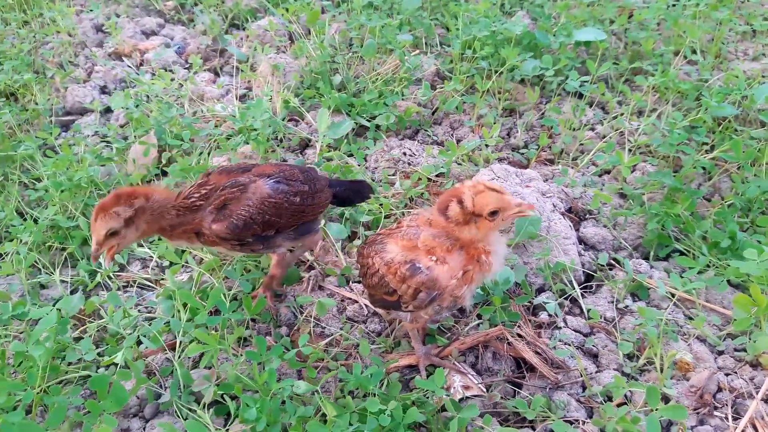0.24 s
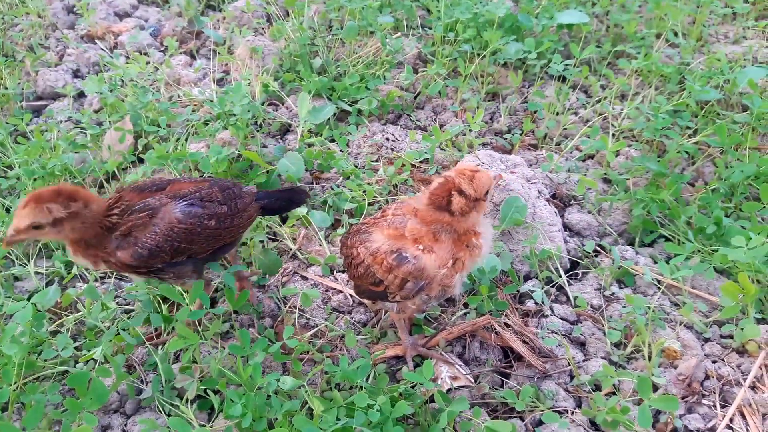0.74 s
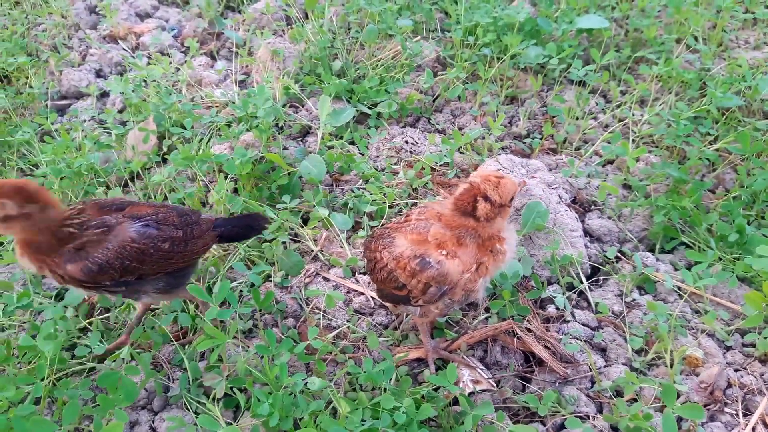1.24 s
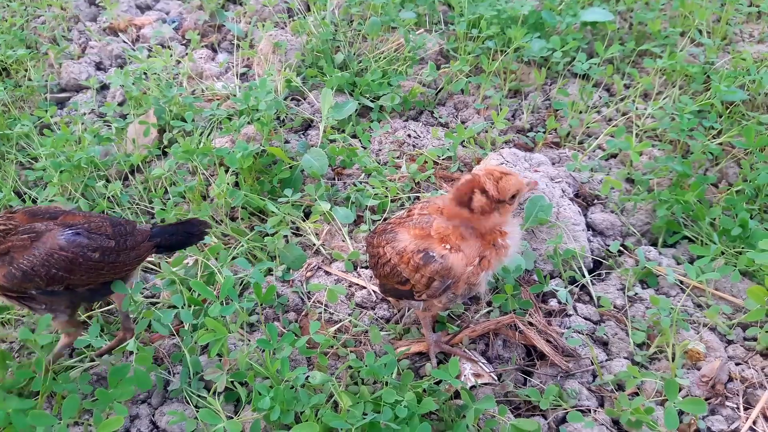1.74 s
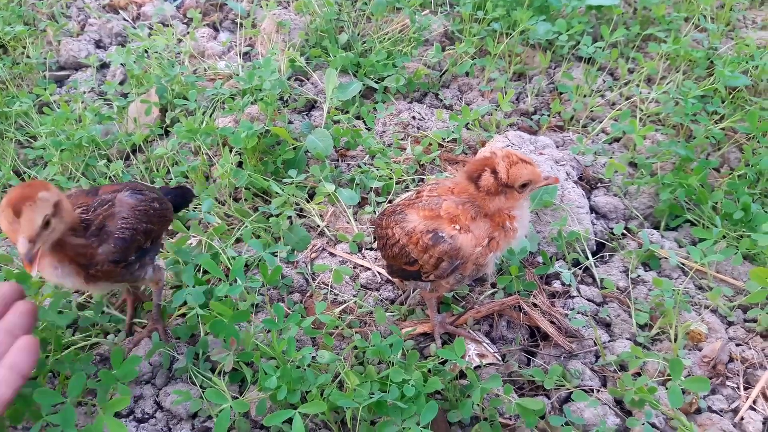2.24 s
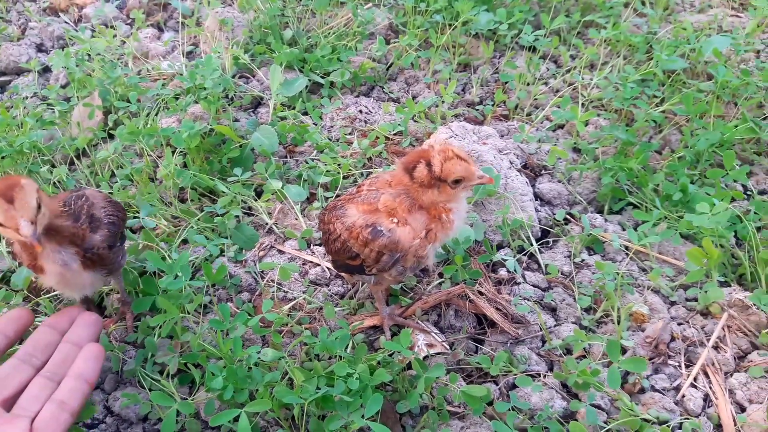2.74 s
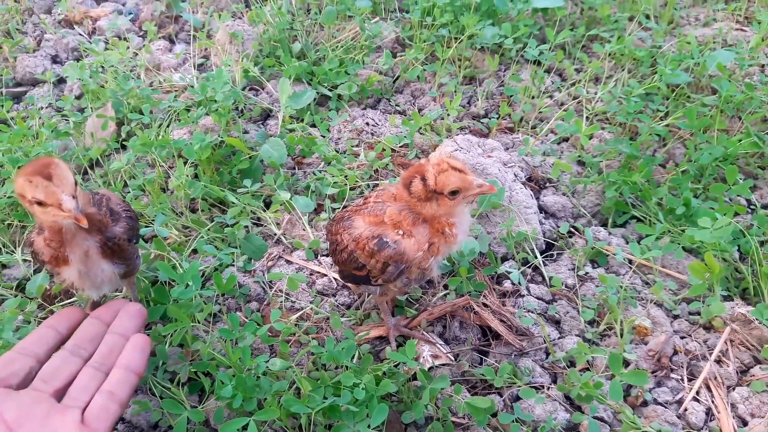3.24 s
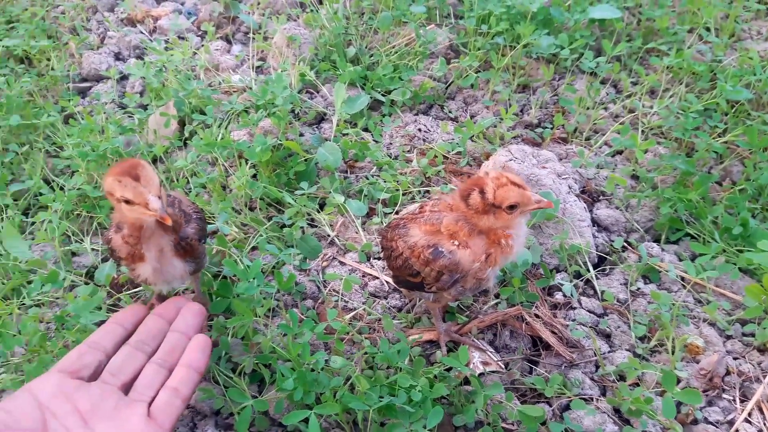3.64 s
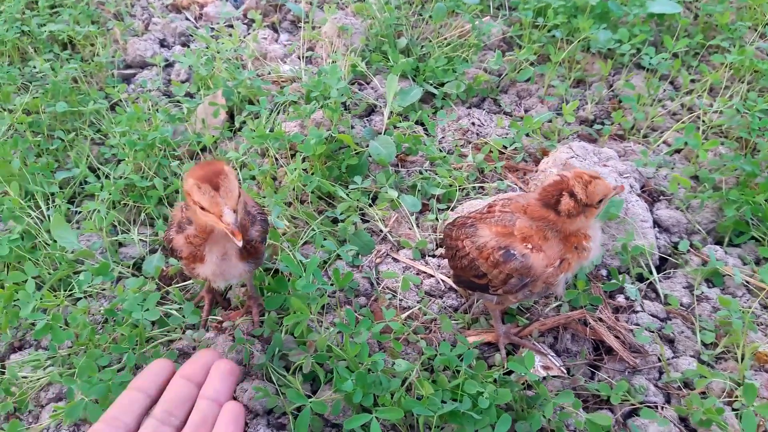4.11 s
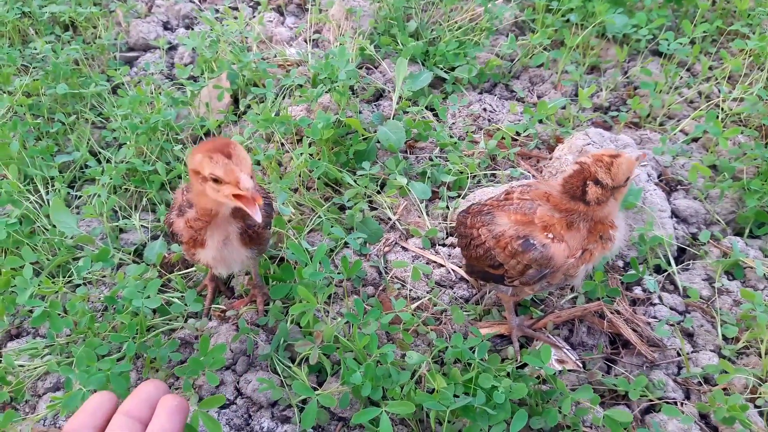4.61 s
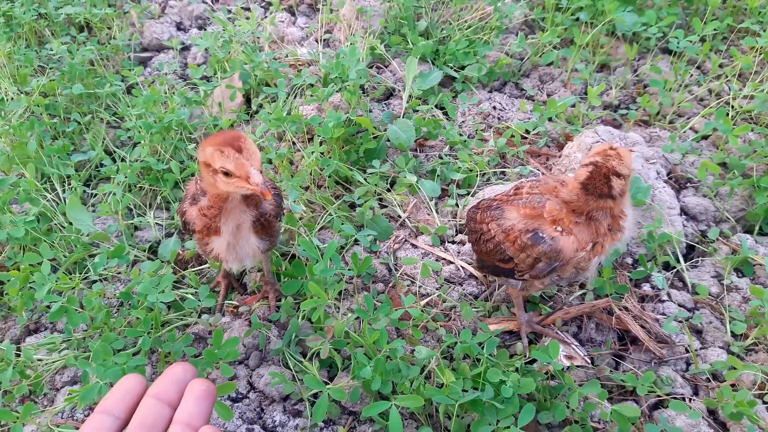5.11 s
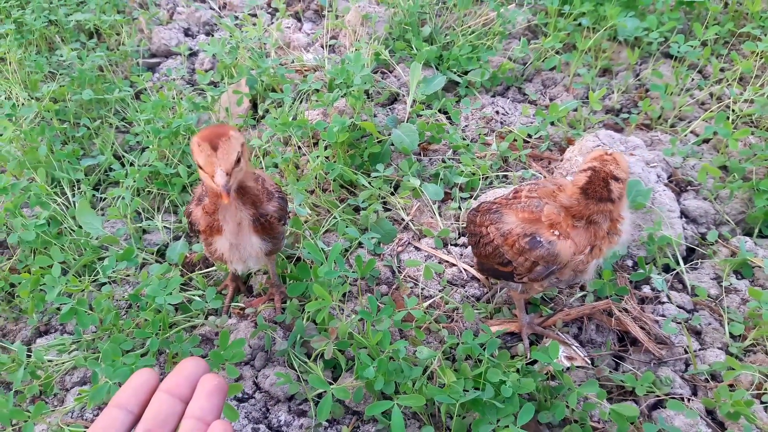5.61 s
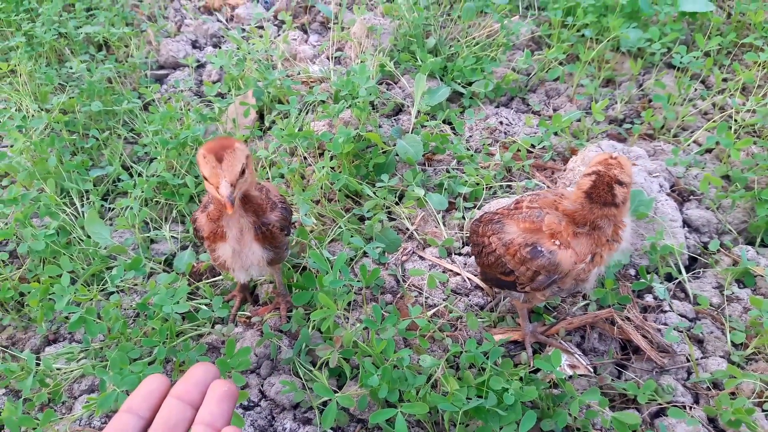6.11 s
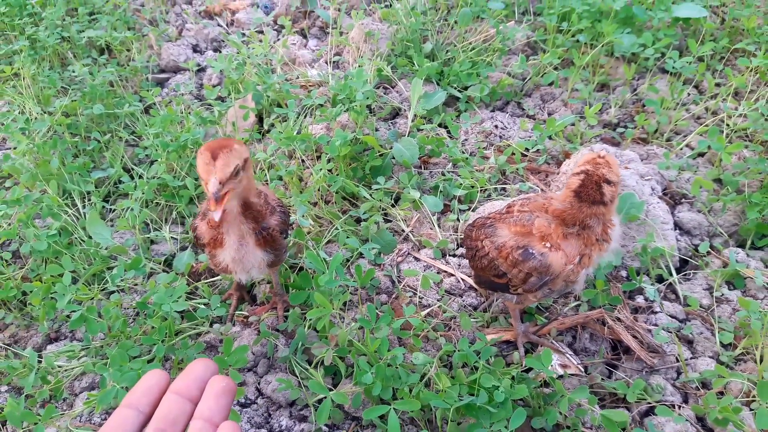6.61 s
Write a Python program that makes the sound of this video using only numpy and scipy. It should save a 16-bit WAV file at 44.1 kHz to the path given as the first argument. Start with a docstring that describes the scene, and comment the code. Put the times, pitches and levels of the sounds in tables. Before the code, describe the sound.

Close outdoor pickup of a loud chick giving short, shrill, down-stepping peeps with slightly raspy, buzzing edges, while a thinner-voiced chick cheeps now and then beside it. Calls are sparse at first, then regular, with a last pair after a short gap. A dull handling knock sounds halfway, with a faint coo far off just before. A weak distant rumble and hiss fill the gaps; the space is dry and open.

```python
"""A loud chick peeps on weedy ground in front of a phone, each peep stepping down into a hold and a falling tail.
A second, thinner chick calls beside it; both are near sines with overtones, heard by two microphone ports.
Short noisy rasps edge the loud voice, and the ground scatters a little of the birds' sound back.
Two low knocks reach the phone as damped rings, and one faint low gliding tone coos far off.
A far drone with a band of hiss, built from random short-time spectra, fills the gaps."""
import sys
import numpy as np
from scipy import signal
from scipy.fft import rfft, irfft, next_fast_len
from scipy.io import wavfile
from scipy.ndimage import uniform_filter1d

SR = 44100
rng = np.random.default_rng(int(sys.argv[2]) if len(sys.argv) > 2 else 0)


def int16_out(signal):
    """Quantize to a 16-bit WAV file."""
    q = np.round(np.clip(np.atleast_2d(signal).T, -1, 1) * 32767)
    wavfile.write(sys.argv[1], SR, q.astype(np.int16))


N = 302526  # samples
EDGE_HZ = 16400  # top of the band
PORT_PAD = 1024  # samples of silence ahead of a sound sent through the ports


def loud_chick():
    """The loud bird: stepped peeps with period doubling, then two sides of the syrinx beating."""
    # one row a peep: start, step lands, period doubling starts, sides of the syrinx part, end [t/s];
    # first, before step, after step, mid hold, end of hold [f/Hz];
    # lead-in, before step, step, mid hold, end of hold, tail [level/dB]; half pitch, quarter pitch [level/dB];
    # opening gap of the sides [f/Hz], overtone brightness [level/dB], extra lead of the left port [us]
    loud_peeps = [ (0.23, 0.264, 0.33, 0.359, 0.377, 3660, 3390, 3280, 3040, 2790, -7, -9, -10, -12.5, -17.5, -19, -19.5, -45, 15, -1, 60),
                  (1.857, 1.892, 1.962, 1.997, 2.022, 4150, 3260, 3070, 2850, 2710, -48, -12, -8.5, -19.5, -13, -10, -13, -19, 18, -4, 100),
                  (2.317, 2.433, 2.448, 2.488, 2.497, 4440, 3270, 2924, 2720, 2540, -27, -3, -4.5, -6.5, -12, -24, -11.5, -24.5, 4, -3.5, 60),
                  (2.887, 2.97, 2.999, 3.072, 3.13, 4280, 3330, 2967, 2750, 2720, -21, -9, -4, -7, -8, -6, -14, -33, 107.5, -1, 55),
                  (3.368, 3.467, 3.478, 3.531, 3.575, 3865, 3460, 2940, 2790, 2750, -19, -6, -4.5, -7.5, -9, -11, -10.5, -21, 121, -1.5, 40),
                  (3.98, 4.062, 4.107, 4.172, 4.213, 3880, 3620, 2965, 2780, 2710, -22, -12.5, -4, -7, -9.5, -5, -14.5, -44, 141, 1, 0),
                  (4.567, 4.66, 4.683, 4.758, 4.82, 4450, 3560, 2990, 2780, 2735, -24, -17, -6.5, -10, -7, -4.5, -13, -30, 110, 0.5, 0),
                  (5.243, 5.308, 5.357, 5.406, 5.475, 3900, 3440, 2940, 2830, 2730, -19, -21, -5.5, -8.5, -6, -4.5, -12.5, -39, 102.5, 0.5, 0),
                  (5.724, 5.82, 5.837, 5.896, 5.945, 3900, 3330, 2900, 2805, 2700, -28, -10, -6.5, -9, -7.5, -5.5, -13, -42, 84, 1.5, 0),
                  (6.52, 6.585, 6.613, 6.676, 6.728, 3690, 3400, 2890, 2715, 2640, -22.5, -11, -6.5, -9.5, -10, -9, -14.5, -56, 121, -0.5, 0),
                  ]
    # unsteady moments: start [t/s], length [s], phase wander scale [rad], flutter [f/Hz], flutter depth [0-1]
    loud_breaks = [(2.325, .04, .4, 90, .5), (2.385, .012, .3, 45, .9), (2.417, .012, .12, 60, .5),
                   (4.575, .03, .45, 150, .5), (6.56, .016, .1, 110, .15)]
    out = np.zeros((2, N))
    for start, step, double, part, *shape, half_db, quarter_db, gap_hz, bright_db, lead_us in loud_peeps:
        rows = loud_shape(start, step, part, *shape)
        voice = peep(rows, bright_db, .1, loud_breaks, double, part, half_db, quarter_db, gap_hz)
        add(out, start - PORT_PAD / SR, ports(voice, lead_us, .1))
    return out


def loud_shape(start, step, part, end, first_hz, edge_hz, low_hz, mid_hz, hold_hz,
               lead_db, edge_db, step_db, mid_db, hold_db, tail_db):
    """Soft sagging lead-in, a step down into a loud hold, a turn and a falling tail: (s, Hz, dB) rows."""
    step_s, turn_s = .013, .012  # length of the step, of the turn into the tail
    turn_hz, end_hz, lead_curl = 120, 2160, 1.5  # drop in the turn, last pitch, bend of the lead-in
    onset_db, step_dip_db, tail_sag_db, tail_end_db = -11, -3.5, -3.5, -22
    edge, turn = step - step_s, part - turn_s
    part_hz = hold_hz - turn_hz
    u = np.linspace(0, 1, 5)  # stations of the lead-in
    lead_in_s = start + u * (edge - start)
    lead_in_hz = first_hz + (edge_hz - first_hz) * u ** lead_curl
    lead_in_db = np.interp(u, [0, .25, 1], [lead_db + onset_db, lead_db, edge_db])
    return [*zip(lead_in_s, lead_in_hz, lead_in_db),
            (step - step_s / 3, low_hz + (edge_hz - low_hz) / 4, step_db),
            (step, low_hz, step_db + step_dip_db),
            (step + .6 * (turn - step), mid_hz, mid_db),
            (turn, hold_hz, hold_db),
            (part, part_hz, tail_db),
            (part + .55 * (end - part), part_hz + .6 * (end_hz - part_hz), tail_db + tail_sag_db),
            (end, end_hz, tail_db + tail_end_db)]


def peep(rows, bright_db, tilt_db, breaks, start=0, part_s=0, half_db=-99, quarter_db=-99, part_hz=0):
    """A near sine with overtones; period doubling adds half orders, the parting sides of the syrinx beat."""
    s, hz, db = np.transpose(rows)
    t = np.arange(s[0], s[-1], 1 / SR)
    hz = uniform_filter1d(np.interp(t, s, hz), size=130)
    db = uniform_filter1d(np.interp(t, s, db), size=130)
    jitter = 1 + .005 * fuzz(len(t), 170).real
    turn = 2 * np.pi * np.cumsum(hz * jitter) / SR  # phase of the fundamental, rad

    for at, length, wander, flutter_hz, depth in breaks:
        on = np.clip(np.minimum(t - at, at + length - t) / 0.0034, 0, 1)
        turn = turn + wander * on * fuzz(len(t), 450).real
        flutter = np.sin(2 * np.pi * flutter_hz * (t - at))
        db = db + 20 * np.log10(1 - np.clip(depth, 0, .95) * on * flutter)

    since = np.maximum(t - part_s, 0) * (part_hz > 0)  # seconds since the sides parted
    apart = np.pi * part_hz * since * (1 + 3 * since)  # the gap widens as the breath runs out
    beat = np.cos(apart)
    voice = beat * np.sin(turn)

    smear = 1 + gain_of(-20.5) * fuzz(len(t), 1500)  # turbulence fills the space between overtones
    for k in range(2, 7):
        level_db = bright_db + 5.1 * fuzz(len(t), 41).real - tilt_db * max(k - 3, 0)
        level_db -= 300 * since * (k - 2)  # the high overtones die first once the sides part
        level_db -= 0.14 * (db + 9.5)  # swells lift the fundamental more than the overtones
        partial = (smear * np.exp(1j * k * turn)).real
        voice += gain_of(level_db) * overtone(k * hz) * beat ** k * partial

    # period doubling fades in, and out again as the sides part
    gate = np.clip(np.minimum(t - start, part_s - .008 - t) / 0.018 + .5, 0, 1) ** 2
    gate = gate * gain_of(0.78 * fuzz(len(t), 63).real)  # the doubling is unsteady
    halves = np.sin(turn / 2) + gain_of(-6.5) * np.sin(3 * turn / 2)
    for k in range(5, 13, 2):
        halves += gain_of(bright_db) * overtone(k * hz / 2) ** 0.57 * np.sin(k * turn / 2)
    quarters = np.sin(5 * turn / 4)
    voice += gate * (gain_of(half_db) * halves + gain_of(quarter_db) * quarters)

    # air rushing past the folds: fuzz around the pitch and a thin wide hiss
    voice += gain_of(-33) * (fuzz(len(t), 1100) * np.exp(1j * turn)).real
    voice += gain_of(-48.5) * np.diff(rng.standard_normal(len(t) + 1))
    return np.sqrt(2) * gain_of(db) * voice * signal.windows.tukey(len(t), .04)


def overtone(hz):
    """Gain of an overtone: a low base plus the windpipe resonances."""
    # resonances of the windpipe that lift the overtones: centre [f/Hz], width [Hz], peak [level/dB]
    windpipe = [(5600, 800, -20.5), (8670, 520, -27.5), (11525, 520, -26.5), (14700, 740, -22.5)]
    peaks = sum(gain_of(db) / (1 + (2 * (hz - f) / w) ** 2) for f, w, db in windpipe)
    return (gain_of(-42.5) + peaks) * (hz < EDGE_HZ)


def thin_chick():
    """The thinner bird: single-voiced peeps whose steep tilt keeps the high overtones weak."""
    # one row a peep: start, drop starts, drop lands, final fall starts, end [t/s];
    # top, after the drop, before the fall, end [f/Hz];
    # top, after the drop, before the fall, swell in the fall [level/dB]; extra lead of the left port [us]
    thin_peeps = [ (0.163, 0.173, 0.179, 0.3, 0.33, 4620, 4170, 3640, 3100, -42, -24, -13, -9, 65),
                  (0.53, 0.6, 0.622, 0.638, 0.696, 4590, 4360, 4000, 2540, -28.5, -21, -21.5, -10, 105),
                  (3.152, 3.164, 3.172, 3.27, 3.307, 4500, 4067, 3780, 2720, -49, -27.5, -15.5, -15.5, 125),
                  (4.012, 4.047, 4.055, 4.135, 4.172, 4590, 3970, 3720, 2860, -34, -23.5, -20.5, -11, 35),
                  (4.608, 4.618, 4.625, 4.703, 4.749, 4160, 4050, 3730, 2930, -24, -21, -10, -14, 40),
                  (4.927, 5.01, 5.03, 5.054, 5.098, 4570, 4300, 3930, 2250, -21.5, -19.5, -20, -10, 45),
                  (5.753, 5.792, 5.826, 5.888, 5.936, 4520, 3780, 3660, 2680, -20.5, -15, -12, -11, 40),
                  (6.515, 6.568, 6.606, 6.658, 6.694, 4480, 3700, 3510, 2700, -24, -13, -8, -12, 45), ]
    # the voice turns chaotic and flutters: start [t/s], length [s], phase wander scale [rad],
    # flutter [f/Hz], flutter depth [0-1]
    thin_breaks = [(.18, .05, .3, 125, .3), (5.03, .033, .5, 210, .85), (5.796, .014, .8, 200, .3)]
    out = np.zeros((2, N))
    for *shape, lead_us in thin_peeps:
        voice = peep(thin_shape(*shape), -2.6, 9.9, thin_breaks)
        add(out, shape[0] - PORT_PAD / SR, ports(voice, lead_us, 5.4))
    return out


def thin_shape(start, drop, land, fall, end, top_hz, shelf_hz, knee_hz, end_hz,
               top_db, shelf_db, knee_db, swell_db):
    """A quiet arched top, a drop to a slowly sagging shelf, a quick fall that swells and dies: (s, Hz, dB) rows."""
    scoop_hz, fall_curl = 90, 1.9  # rise into the top, bend of the fall
    onset_db, end_db, swell_sag_db = -10, -34, -2
    u = np.array([0, .27, .55, .8, 1])  # stations of the fall
    fall_s = fall + u * (end - fall)
    fall_hz = knee_hz + (end_hz - knee_hz) * u ** fall_curl
    fall_db = [knee_db, swell_db + swell_sag_db, swell_db, swell_db + 2 * swell_sag_db, swell_db + end_db]
    return [(start, top_hz - scoop_hz, top_db + onset_db),
            ((start + drop) / 2, top_hz, top_db),
            (drop, top_hz - scoop_hz / 2, top_db + 1),
            (land, shelf_hz, shelf_db),
            *zip(fall_s, fall_hz, fall_db)]


def rasps():
    """Short bands of noise beside the loud voice: a carrier smeared by low-passed noise."""
    # one row a rasp: start [t/s], length [s], centre [f/Hz], [level/dB]
    bursts = [(2.901, 0.035, 3300, -33.5), (3.38, 0.043, 3000, -31.5), (3.987, 0.051, 3100, -31.5),
              (4.573, 0.032, 4600, -27.5), (4.61, .03, 3200, -36), (2.325, .04, 3500, -36),
              (5.255, .03, 3100, -35), (5.738, 0.05, 2950, -33.5), (6.535, .022, 2850, -33)]
    out = np.zeros((2, N))
    for s, length, hz, db in bursts:
        t = np.arange(0, length, 1 / SR)
        band = (fuzz(len(t), 420) * np.exp(2j * np.pi * hz * t)).real
        burst = gain_of(db) * band * np.hanning(len(t)) ** .5
        add(out, s - PORT_PAD / SR, ports(burst, 40, 1.5))
    return out


def ports(x, lead_us, lean_db):
    """Two microphone ports hear a ground source with their own colour and delay; mean power of the two stays."""
    # left over right before the source's own lean: [f/Hz], [level/dB]
    port_db = [(1400, 2), (2250, -7.5), (2700, -1.6), (3900, 2.5), (4500, 15), (5500, 12), (6200, 6.5),
               (7800, 27.5), (16000, 14)]
    # phase by which the left leads before the source's extra lead: [f/Hz], [rad]
    port_lead = [(0, 0), (1400, 1.7), (2400, 4.5), (2900, 5.6), (3900, 8.5), (5940, 12.4), (16000, 21)]
    size = next_fast_len(len(x) + 4096)
    hz = np.fft.rfftfreq(size, 1 / SR)
    right = gain_of(-read(port_db, hz) - lean_db)
    lead = np.interp(hz, *np.transpose(port_lead)) + 2 * np.pi * hz * lead_us / 10 ** 6
    pair = np.array([np.ones(len(hz)), right * np.exp(-1j * lead)])
    pair = pair * np.sqrt(2 / (1 + right ** 2))
    return irfft(rfft(np.pad(x, PORT_PAD), size) * pair, size)


def ground(x):
    """Sparse dying taps: stones and leaves scatter a little sound back."""
    t = np.arange(200, 12000)  # samples
    signs = rng.choice([-1., 1.], (2, len(t)))
    present = rng.random((2, len(t))) < .1
    taps = signs * present * gain_of(-60 * t / SR / .07)  # dies by 60 dB in 0.07 s
    taps = taps / np.linalg.norm(taps, axis=1, keepdims=True)
    taps = np.pad(taps, ((0, 0), (200, 0)))
    return signal.fftconvolve(x, taps, axes=1)[:, :N]


def knocks():
    """Low knocks reaching the phone: damped rings of two partials."""
    # one row a knock: start [t/s], [level/dB], lower partial [f/Hz], time to die by 60 dB [s]
    hits = [(3.551, -20, 160, 0.038), (6.05, -33.5, 307, 0.059)]
    out, t = np.zeros(N), np.arange(6000) / SR
    for s, db, hz, t60 in hits:
        ring = np.sin(2 * np.pi * hz * t) + .5 * np.sin(2 * np.pi * 1.83 * hz * t)
        attack = np.minimum(t / 0.0056, 1)
        add(out, s, gain_of(db - 60 * t / t60) * ring * attack)
    return out


def coos():
    """A faint far coo: a soft glide of a fundamental and its octave."""
    # one row a coo: start [t/s], length [s], first [f/Hz], last [f/Hz], [level/dB]
    glides = [(3.126, 0.157, 313, 259, -45.5)]
    out = np.zeros(N)
    for s, length, first_hz, last_hz, db in glides:
        turn = 2 * np.pi * np.cumsum(np.linspace(first_hz, last_hz, round(length * SR))) / SR
        tone = np.sin(turn) + gain_of(-13) * np.sin(2 * turn)
        add(out, s, gain_of(db) * tone * signal.windows.tukey(len(turn), .4))
    return out


def drone():
    """The far drone and hiss: random short-time spectra with drifting patches, partly alike at both ports."""
    # relative spectrum: [f/Hz], density [level/dB]
    spectrum = [(21, -47), (35, -27), (76, 2), (170, -4.5), (319, -15.5), (940, -20), (1350, -10.5),
                (1980, -7), (2700, -20), (5000, -26), (8600, -49.5), (12000, -35), (16300, -30.5)]
    # likeness of the two ports: [f/Hz], correlation [-1 to 1]
    likeness = [(60, .93), (300, 0.75), (900, 0.3), (2000, 0.49), (4000, -0.099)]
    # left over right: [f/Hz], [level/dB]
    balance = [(60, 0.5), (800, 3.5), (2400, -8.5), (4400, 4.5)]
    frames, hz = N // 256 + 5, np.fft.rfftfreq(1024, 1 / SR)
    a, b, c, d, patches = rng.standard_normal((frames, 513, 5)).T
    patches = uniform_filter1d(patches, size=10, axis=0)  # across frequency
    patches = evened(uniform_filter1d(patches, size=20, axis=1))  # across time
    same = np.clip(read(likeness, hz), -1, 1)[:, None]
    left = a + 1j * b
    right = same * left + np.sqrt(1 - same ** 2) * (c + 1j * d)
    lean_db = np.array([.5, -.5])[:, None, None] * read(balance, hz)[:, None]
    z = np.array([left, right]) * gain_of(read(spectrum, hz)[:, None] + lean_db + 1.2 * patches)
    x = signal.istft(z, nperseg=1024, noverlap=768)[1][:, :N]
    return gain_of(-43.5) * x / np.sqrt(np.mean(x.mean(0) ** 2))  # rms of the two ports' mean: -43.5 dB


def fuzz(size, width_hz):
    """Complex low-passed noise of rms 1: on a carrier it smears the line to about that width."""
    z = rng.standard_normal((size, 2)) @ [1, 1j]
    r = np.exp(-np.pi * width_hz / SR)
    z = signal.lfilter([1], [1, -2 * r, r ** 2], z)
    return z / np.sqrt(np.mean(abs(z) ** 2))


def gain_of(db):
    """Decibels to a factor."""
    return 10 ** (np.asarray(db) / 20)


def evened(x):
    """Scales to rms 1."""
    return x / np.sqrt(np.mean(x ** 2) + 1e-20)


def read(points, hz):
    """Reads a spectrum on a log-frequency axis."""
    f, value = np.transpose(points)
    return np.interp(np.log(hz + 1), np.log(f + 1), value)


def add(mix, s, sound):
    """Mixes a sound in at a time in seconds."""
    part = mix[..., round(s * SR):][..., :sound.shape[-1]]
    part += sound[..., :part.shape[-1]]


def scene():
    """All sources at the two ports, near birds to far drone."""
    birds = loud_chick() + thin_chick() + rasps()
    return birds + gain_of(-21) * ground(birds) + knocks() + coos() + drone()


def record(dry):
    """The microphone signal clips at full scale; then a low-pass limits the band."""
    clipped = np.clip(dry, -1, 1)
    low_pass = signal.firwin(511, EDGE_HZ, window=("kaiser", 9), fs=SR)
    return signal.oaconvolve(clipped, low_pass[None], "same")


dry = scene()
out = record(dry)
int16_out(out)
```